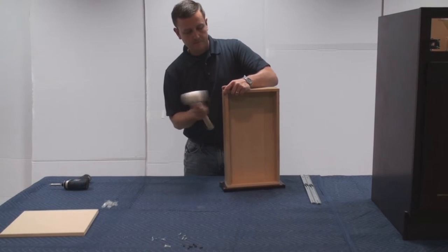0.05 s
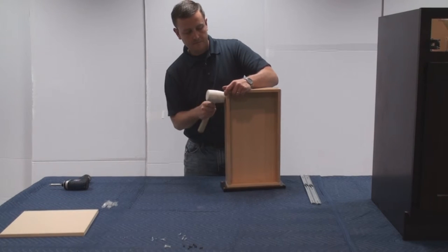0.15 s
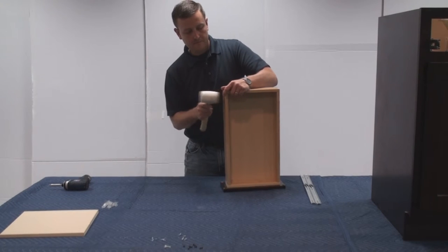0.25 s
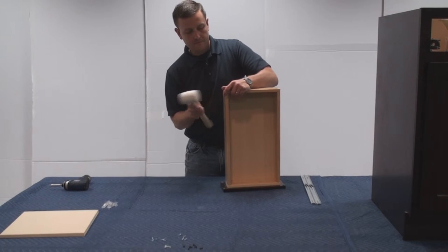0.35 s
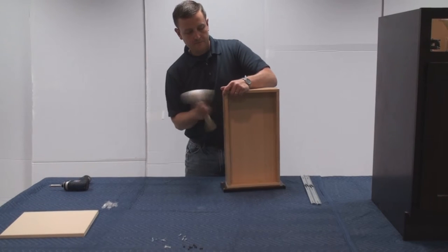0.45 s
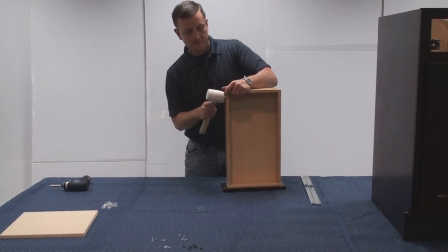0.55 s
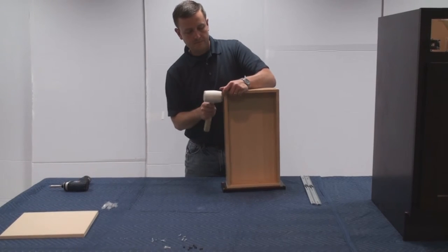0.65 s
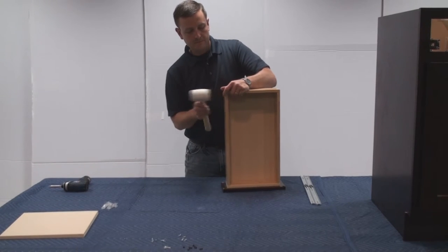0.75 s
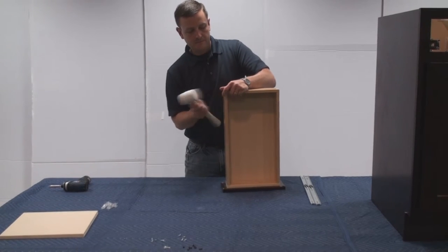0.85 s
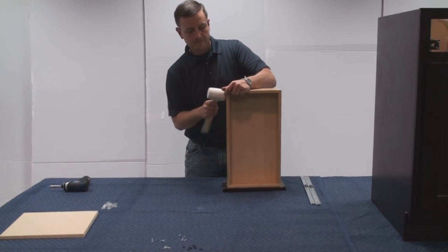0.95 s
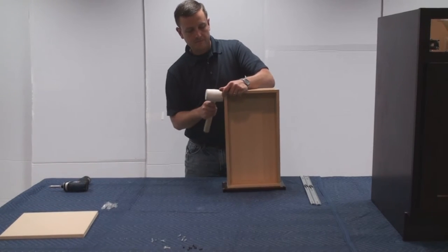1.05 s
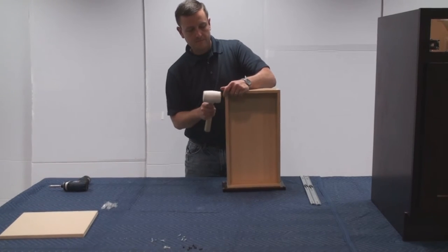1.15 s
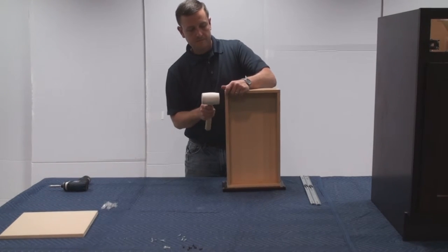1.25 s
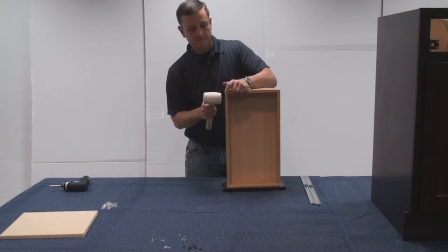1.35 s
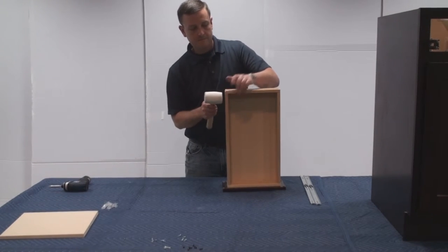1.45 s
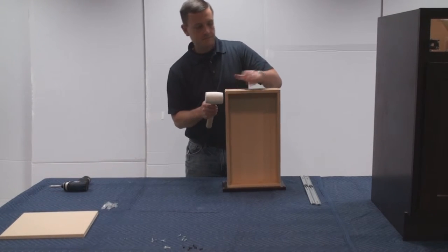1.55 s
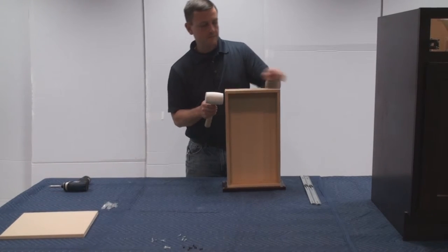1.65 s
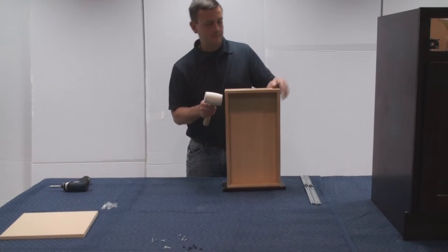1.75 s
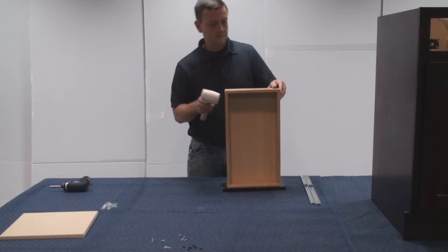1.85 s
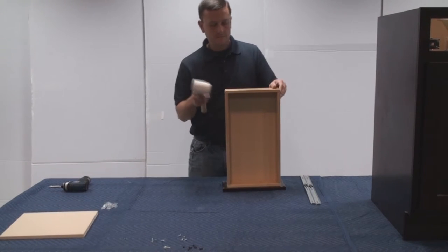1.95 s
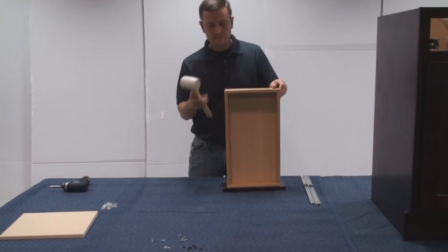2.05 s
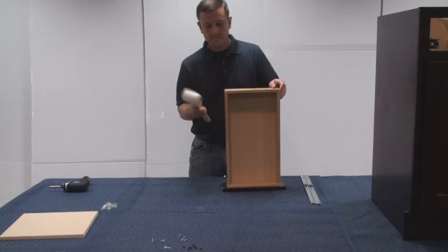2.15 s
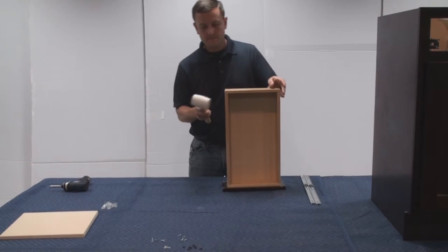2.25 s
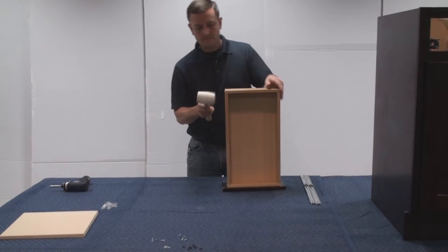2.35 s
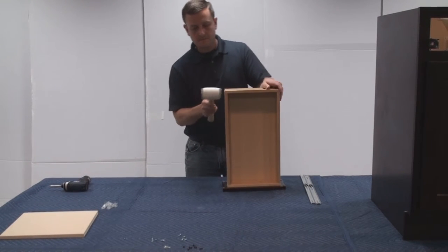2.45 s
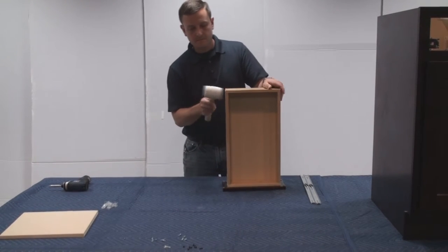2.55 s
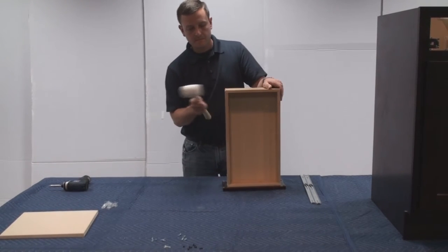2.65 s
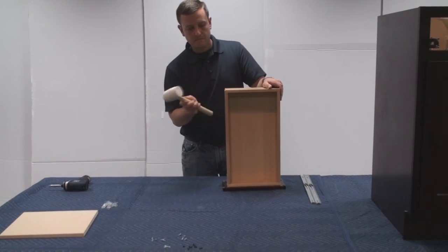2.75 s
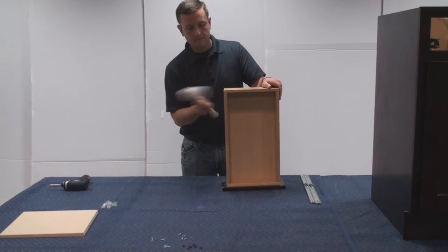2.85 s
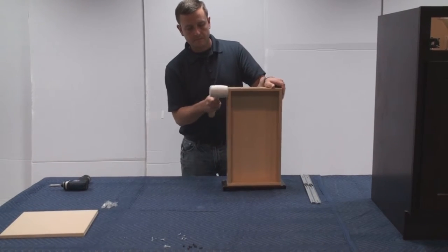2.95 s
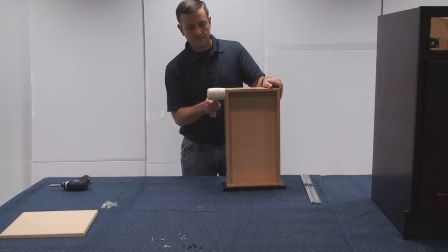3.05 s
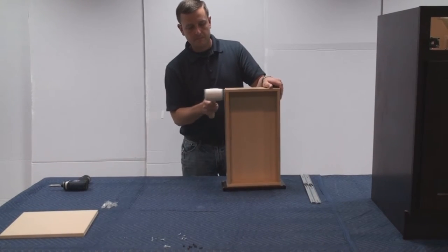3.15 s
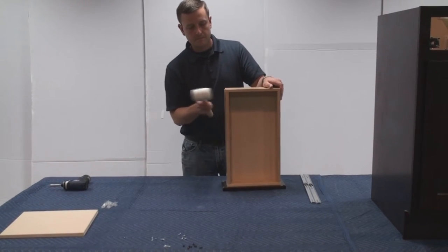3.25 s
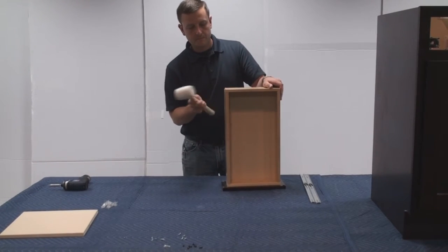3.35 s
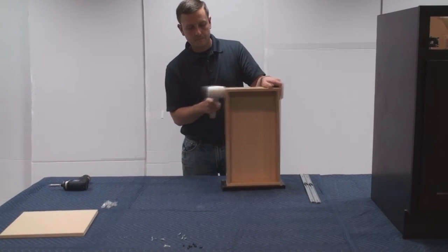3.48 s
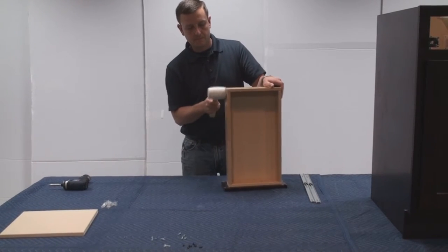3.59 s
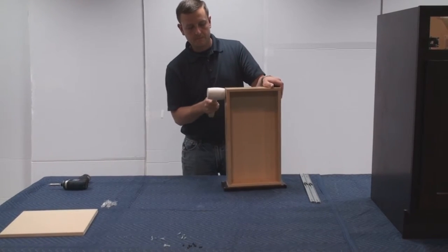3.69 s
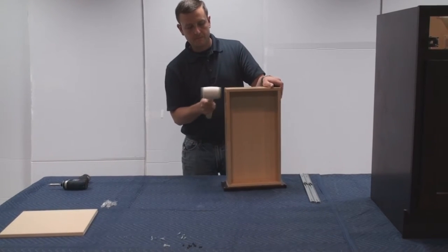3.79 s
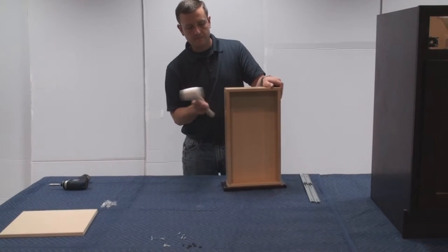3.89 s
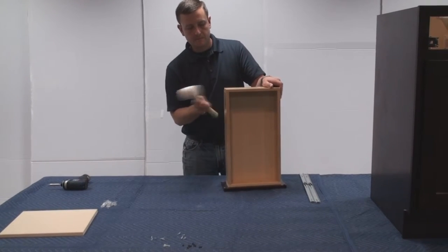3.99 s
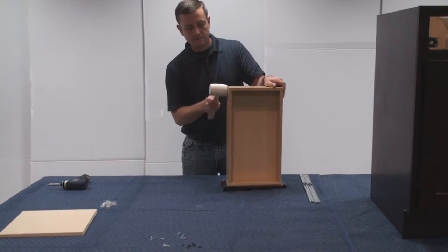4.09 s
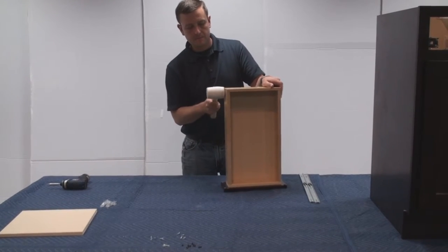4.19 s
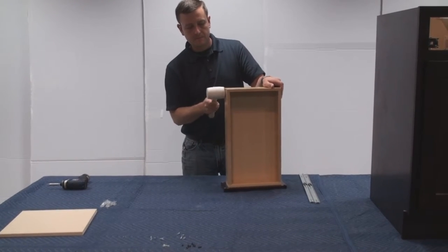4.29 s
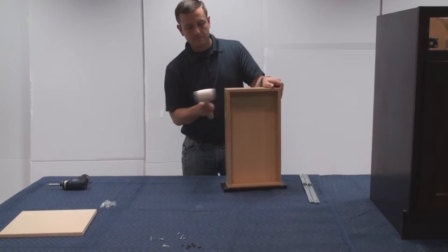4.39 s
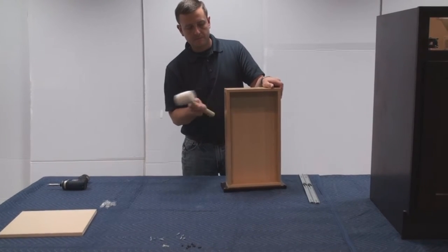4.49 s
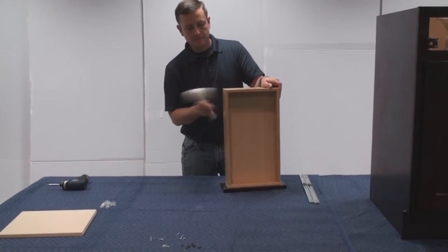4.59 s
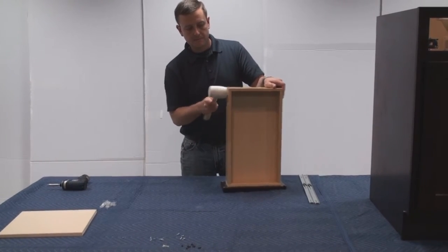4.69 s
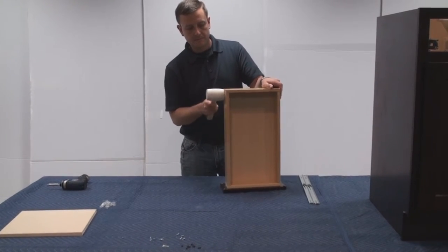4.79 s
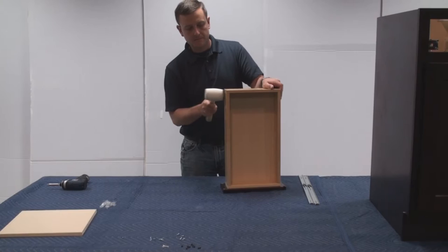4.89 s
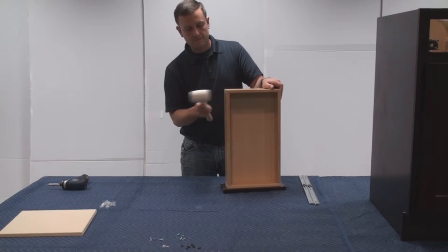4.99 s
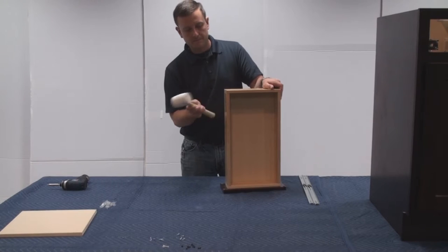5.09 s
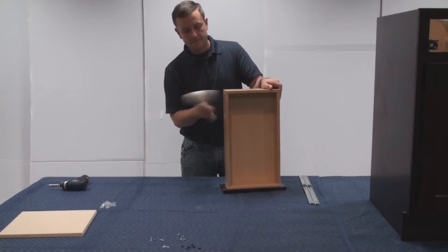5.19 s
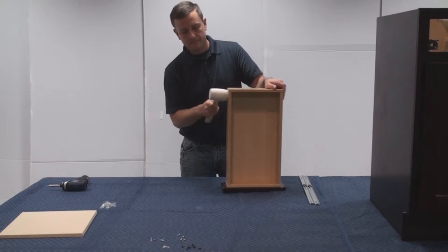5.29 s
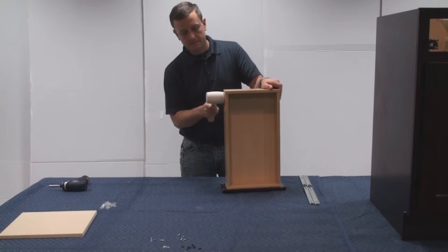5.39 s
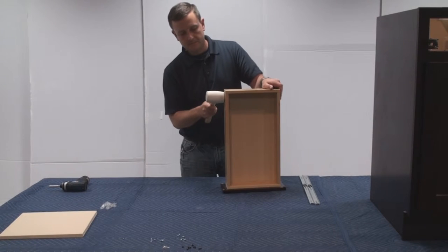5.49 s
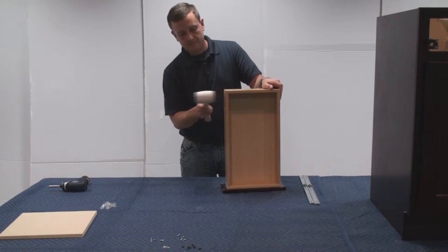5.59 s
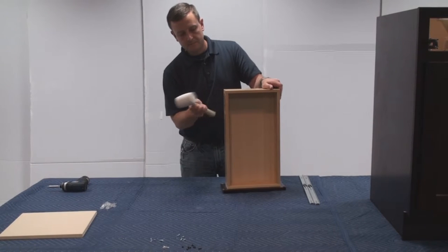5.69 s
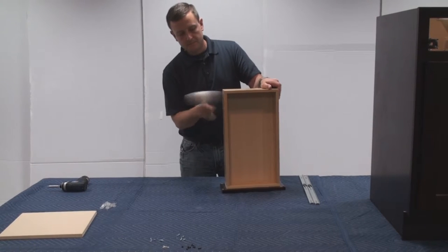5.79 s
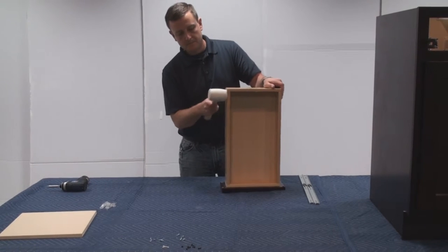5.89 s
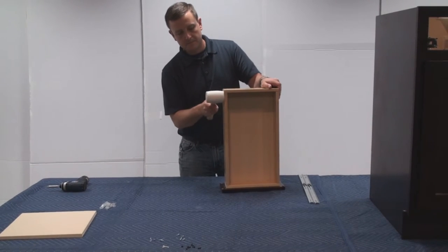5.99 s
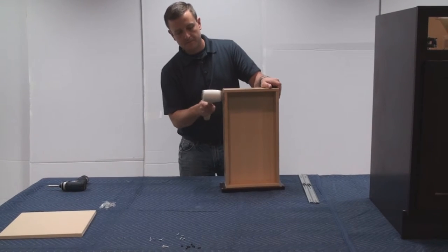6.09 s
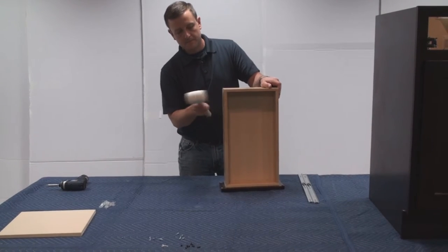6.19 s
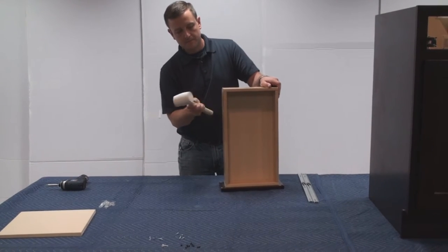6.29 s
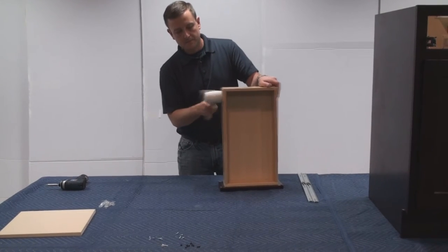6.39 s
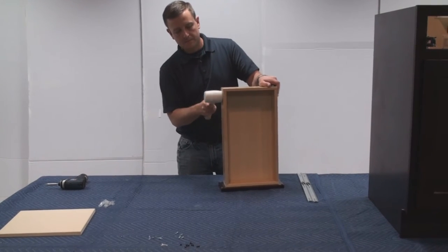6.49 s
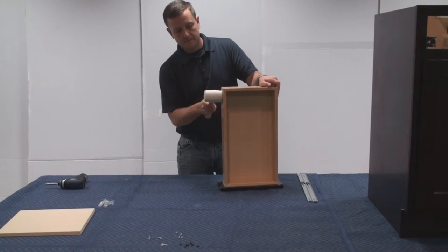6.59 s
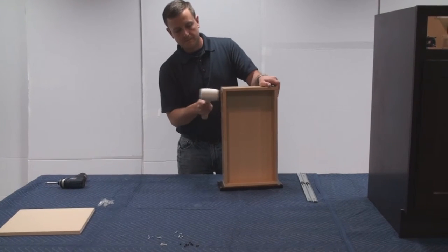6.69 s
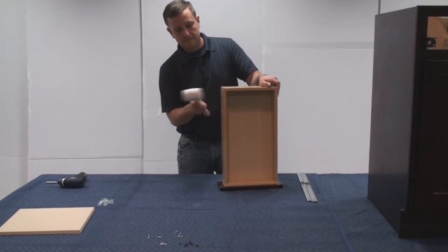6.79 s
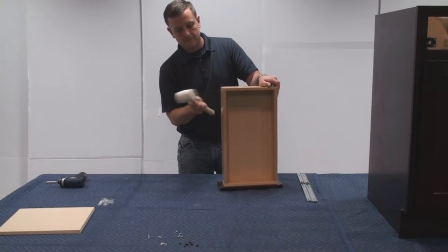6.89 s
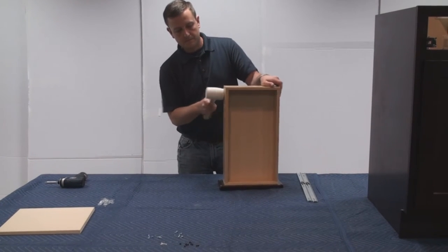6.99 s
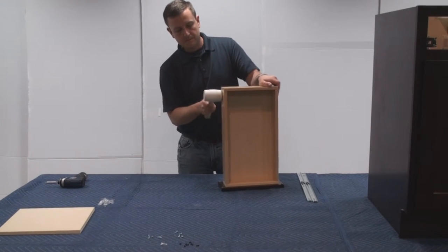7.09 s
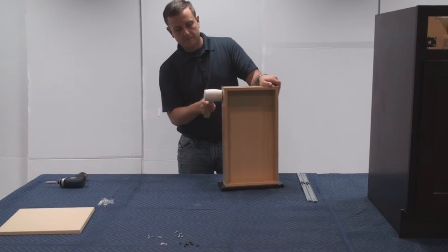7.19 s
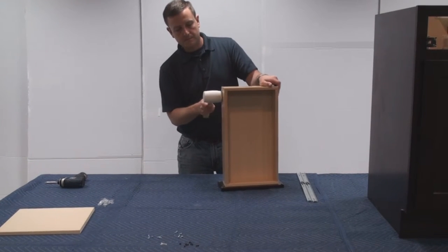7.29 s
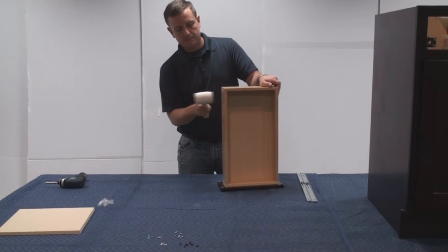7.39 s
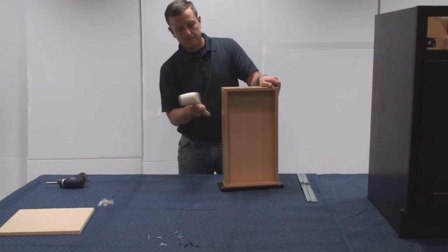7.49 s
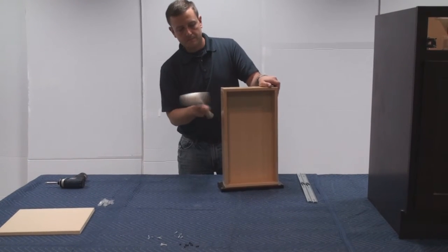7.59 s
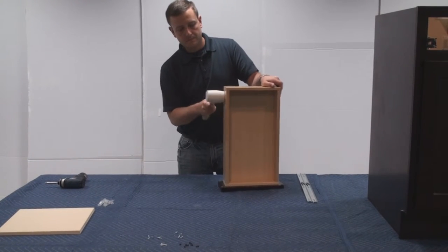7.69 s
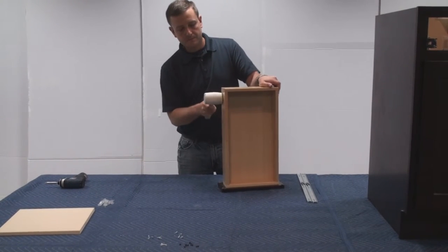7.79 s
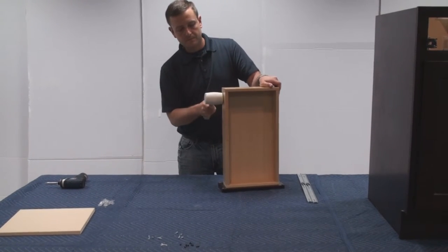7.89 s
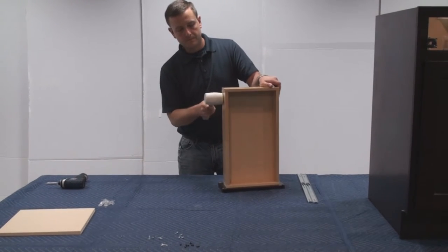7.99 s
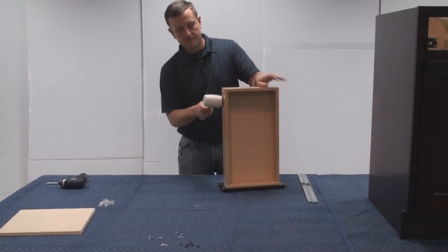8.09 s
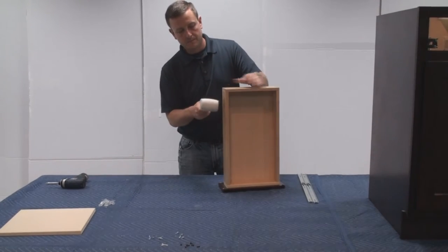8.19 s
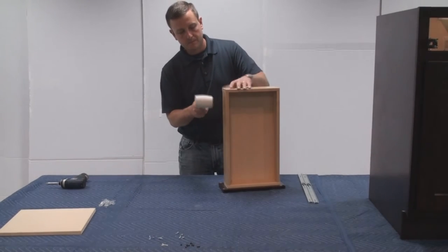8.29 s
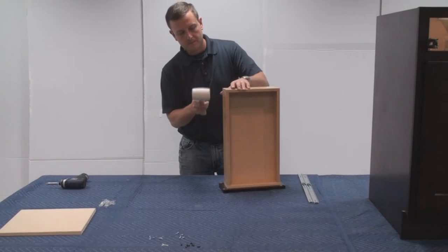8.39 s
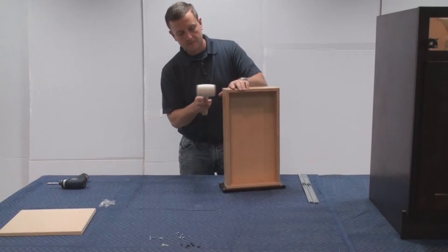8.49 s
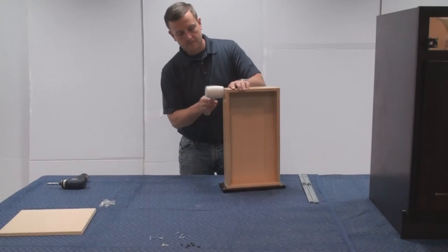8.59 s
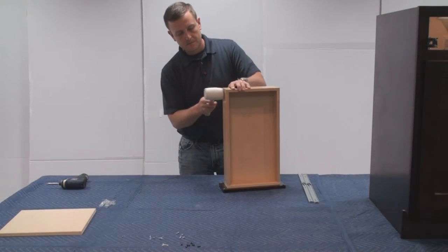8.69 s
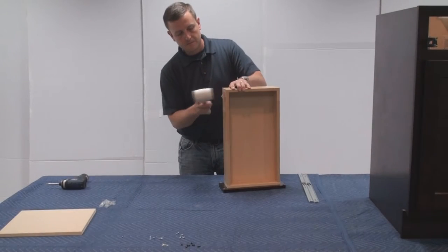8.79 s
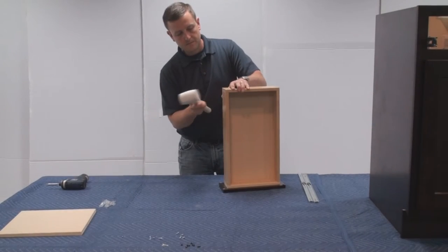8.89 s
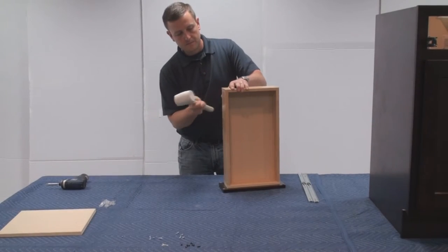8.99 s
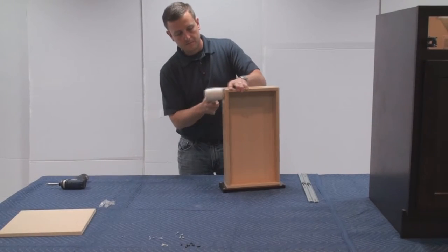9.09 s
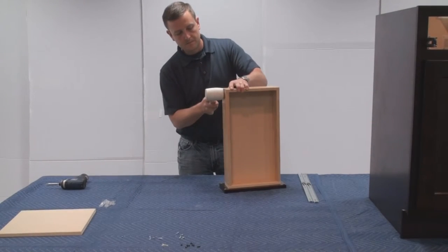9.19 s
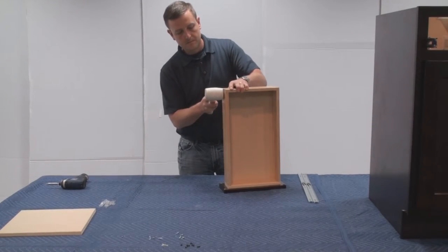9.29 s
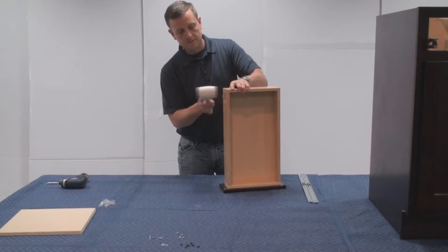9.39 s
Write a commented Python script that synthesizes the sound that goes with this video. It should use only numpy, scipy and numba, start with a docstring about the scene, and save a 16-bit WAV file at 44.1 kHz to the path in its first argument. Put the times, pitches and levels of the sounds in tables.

```python
"""Mallet driving a drawer box

A rubber mallet drives a wooden drawer box together on a padded bench in a bare, echoing workshop.
It opens on the dying tail of a blow; blows are ringing panel modes over noise for snap and chatter.
In between, the tight joint squeaks (falling, wavering tones) and ticks (short noise with high modes).
Decaying noise makes the echo, over ventilation and hum; a limiter rides it all and the right side clips."""
import sys
import numpy as np
from scipy import signal
from scipy.fft import rfft, irfft, next_fast_len
from scipy.io import wavfile
from scipy.ndimage import uniform_filter1d
from numba import njit

SR = 44100
rng = np.random.default_rng(int(sys.argv[2]) if len(sys.argv) > 2 else 0)


def digitize_waveform(pressure):
    """Quantize a signal to 16-bit integers and store it at the path in sys.argv[1].

    Rows of a 2-D input are taken as channels; values are limited to [-1, 1].
    """
    field = np.atleast_2d(pressure).T
    bounded = np.clip(field, -1, 1)
    quanta = np.round(bounded * 32767).astype(np.int16)
    wavfile.write(sys.argv[1], SR, quanta)


N = 416744

# Mallet blows, with the panel's main ring and how hard the striking spot drives the panel;
# the first row stands in for the dull, dying tail of a blow already struck:
# start_s, strength_db, main_ring_hz, panel_drive_db
BLOWS = [(0.0, -7.5, 684, 9.5), (0.247, 7.5, 692, 4.5), (0.635, 7, 577, 2.5), (1.055, 6, 578, 0.5),
         (2.644, -10, 590, 1.5), (3.037, 9, 600, -1.5), (3.635, 8.5, 610, 5.5), (4.188, 5, 560, -6),
         (4.766, 5.5, 674, 1), (5.366, 4, 594, 1.5), (5.966, 4, 692, 0.5), (6.538, 7, 598, -0.5),
         (7.098, 5, 625, 0), (7.778, 5, 647, -3), (8.743, -18, 588, 1.5), (9.232, 3.5, 625, 2)]
# Where bass, boom, thump, main ring, upper ring, clack and crack sit: pitch_hz
COLOUR_HZ = [60, 170, 340, 610, 1150, 2300, 6000]
# Blow colour at those pitches, a hand on top damping the board and pressing the box down: level_db
HAND_ON_TOP_DB = [-13, 5, 0.5, 1, -0.24, 0.5, -0.5]
# The same with the hand at the far corner, which lets the top board ring: level_db
HAND_AT_CORNER_DB = [-14.5, -1.0, -0.15, -0.5, 1.44, 1.2, 1]
# When the hand holds the far corner: start_s, end_s
HAND_AT_CORNER_S = (1.8, 8.25)
# Range that a slow push thumps in: pitch_hz, share (0 to 1)
THUMP_RANGE = [(340, 1), (610, 0)]
# Range that the striking spot lifts or drops: pitch_hz, share (0 to 1)
PANEL_RANGE = [(340, 0), (610, 1), (1150, 0)]
# The box's other modes, before each blow's own scatter: pitch_hz, level_db, t60_s
BOX_MODES = [(151.4, -18.5, 0.18), (189.2, -16, 0.27), (235.8, -12.5, 0.43), (334, -4, 0.032),
             (427.6, -14.5, 0.14), (551.3, -11, 0.17), (578.5, -0.5, 0.12), (645.6, -8, 0.23),
             (714.3, -9.5, 0.14), (821, -4, 0.047), (960, -74, 0.1), (1170, -2.5, 0.071), (1211, -5, 0.11),
             (1257, -4, 0.14), (1883, -14.5, 0.28), (1970, -4.5, 0.022), (2720, -20, 0.1),
             (3920, -5, 0.0065)]
# Dense, quickly damped response of the boards: pitch_hz, level_db (relative, per hertz)
BOARDS = [(40, -15), (110, -27.5), (170, 0.5), (330, -2.5), (600, 9.5), (800, 1), (1250, 6), (1600, -2),
          (2100, -1), (4000, -7), (6000, -12), (10000, -18.5), (15000, -28.5)]
# Stick-slip squeaks of the joint: start_s, length_s, start_hz, end_hz, level_db, overtone_step_db
SQUEAKS = [(2.335, 0.046, 2407, 1920, -33, -7.5), (2.532, 0.035, 1353, 1260, -31.5, -27)]
# Joint ticks as it is pressed and lined up: start_s, level_db
TICKS = [(2.510, -29), (8.245, -51)]
# What a ticking joint rings with: pitch_hz, level_db, t60_s
TICK_MODES = [(1780, 7, 0.09), (2270, -13, 0.13), (2960, 0, 0.06), (3740, -3, 0.06)]
# The room's ring: pitch_hz, t60_s
ROOM_T60 = [(100, 0.42), (260, 0.51), (700, 0.63), (2000, 0.59), (5000, 0.5), (9000, 0.39), (15000, 0.043)]
# Colour of ventilation and microphone hiss: pitch_hz, level_db (relative, per hertz)
AIR = [(15, -29), (25, -47), (48, -4.5), (90, -14), (121, -10.5), (224, -11), (301, -16), (344, -12),
       (383, -17.5), (749, -17.5), (2780, -28.5), (15000, -46)]
# Mains hum, before the limiter and right-hand gain: pitch_hz, level_db (RMS)
HUM = [(59.5, -60.5), (119, -57)]

# Main ring level beside the other modes (dB), and the share of the panel drive added to it
MAIN_RING_DB, MAIN_RING_SHARE = -1.5, 0.13
# Rubber stiffens under load: push time (s) and treble corner (Hz) at 0 dB strength, dB per doubling
PUSH_S, CONTACT_HZ, STIFFEN_DB_PER_OCTAVE = 0.00033, 8700, 5.5
# A slow push moves the whole box: dB of thump gained per dB of lost strength
THUMP_SLOPE = 0.25
# Treble limits of both channels and of the duller left one
TOP_HZ, LEFT_TOP_HZ = 15700, 11400


def blow_colour(s, strength_db, stiffness, panel_db):
    """Level at COLOUR_HZ: the hand shapes the ring, the spot sets the panel, soft blows are dull and thumpy."""
    hz = np.array(COLOUR_HZ)
    at_corner = HAND_AT_CORNER_S[0] < s < HAND_AT_CORNER_S[1]
    hand_db = HAND_AT_CORNER_DB if at_corner else HAND_ON_TOP_DB
    spot_db = panel_db * on_log_axis(hz, PANEL_RANGE)
    rubber_db = -20 * np.log10(1 + (hz / (CONTACT_HZ * stiffness)) ** 2)
    thump_db = -THUMP_SLOPE * strength_db * on_log_axis(hz, THUMP_RANGE)
    return hand_db + spot_db + rubber_db + thump_db


def knock(main_hz, main_db, tone_db, boards_db, push_s, main_t60=0.095, chatter_t60=0.082,
          snap_db=-4, snap_t60=0.0047, detune=0.006, scatter_db=3.0):
    """One blow: the joint snaps home and chatters through the boards while the panel modes ring on."""
    t = seconds(0.45)
    all_modes = [(main_hz, main_db, main_t60), *BOX_MODES]
    hz, db, t60 = np.transpose(all_modes)[:, :, None]
    # grip nudges the pitches and striking spot the levels, afresh for each blow
    grip, spot = rng.standard_normal((2, len(hz), 1))
    modes = unit(np.sin(2 * np.pi * hz * (1 + detune * grip) * t) * fade(t, t60))
    sign = rng.choice([-1, 1], hz.shape)
    sign[np.abs(hz - main_hz) < 30] = 1  # close neighbours swing with the main ring
    push = 1 - np.exp(-t / push_s)  # the rubber head takes a moment to press home
    ring = push * np.sum(sign * modes * undb(db + scatter_db * spot), axis=0)
    chatter = unit(fade(t, chatter_t60))
    snap = undb(snap_db) * unit(fade(t, snap_t60))
    contact = push * rng.standard_normal(len(t)) * (chatter + snap)
    boards = unit(colour(even(contact, width_hz=23.6), BOARDS))
    wood = unit(ring) + undb(boards_db) * boards
    return unit(colour(wood, list(zip(COLOUR_HZ, tone_db))))


def squeak(length, start_hz, end_hz, step_db, waver=0.023, die_t60=0.11):
    """Wood slips on wood: a brief, falling, unsteady tone that swells fast and dies as its overtones grow."""
    t = seconds(length)
    wobble = uniform_filter1d(rng.standard_normal(len(t)), size=40)
    hz = np.linspace(start_hz, end_hz, len(t)) * (1 + waver * wobble / wobble.std())
    phase = 2 * np.pi * np.cumsum(hz) / SR
    drag = np.sqrt(2 * t / length)
    # k = 0 is the fundamental
    tone = sum(undb(step_db * k ** 1.7) * drag ** k * np.sin((k + 1) * phase) for k in range(3))
    swell = np.sqrt(np.sin(np.pi * t / length))
    return unit(tone * swell * fade(t, die_t60))


def tick(t60=0.044, ring_db=-3):
    """A small dry crack of a joint with a few high wood modes, without the body's low ring."""
    t = seconds(.2)
    crack = even(rng.standard_normal(len(t)) * fade(t, t60), width_hz=660)
    crack_colour = [(100, -19), (600, 4), (2000, 1.5), (3500, -1.0), (6000, -13), (14000, -25)]
    crack = unit(colour(crack, crack_colour))
    ring = sum(undb(db) * unit(np.sin(2 * np.pi * hz * t) * fade(t, ring_t60))
               for hz, db, ring_t60 in TICK_MODES)
    return unit(crack + undb(ring_db) * unit(ring))


def workshop(x, direct_db=-8, build_s=0.0041, early_db=-2, early_t60=0.14, alike_hz=220, spread=0.74):
    """Direct sound, early reflections and dense echo off bare walls; fresh grain as worker and box shift."""
    t = seconds(.8)
    hz = np.fft.rfftfreq(len(t), 1 / SR)
    mid, side = rfft(rng.standard_normal((2, len(t))))
    apart = spread * hz / np.hypot(hz, alike_hz)  # the two microphones hear the lows alike
    spectrum = mid + np.array([[1], [-1]]) * apart * side
    centres, t60s = np.transpose(ROOM_T60)
    # overlapping bands that add up to one
    bands = [on_log_axis(hz, list(zip(centres, row))) for row in np.eye(len(centres))]
    late = sum(irfft(spectrum * band, len(t)) * fade(t, t60) for band, t60 in zip(bands, t60s))
    early = irfft(spectrum, len(t)) * fade(t, early_t60)
    build_up = 1 - np.exp(-t / build_s)
    echo = (late + undb(early_db) * early) * build_up
    response = np.array([even(channel, width_hz=49) for channel in echo])
    response[:, 0] += undb(direct_db)
    response[1] = np.roll(response[1], 1)  # the sound reaches the left microphone a sample sooner
    return signal.fftconvolve(x[None], response, axes=1)


def background(air_db=-48, tilt_db=1, shared=0.55):
    """Steady ventilation noise, partly common to both sides and tilted right, with a faint mains hum."""
    left, right, both = rng.standard_normal((3, N))
    air = unit(colour(np.array([left, right]) + shared * both, AIR)) * np.sqrt(N)  # unit RMS
    t = np.arange(N) / SR
    hum = sum(np.sqrt(2) * undb(db) * np.sin(2 * np.pi * hz * t) for hz, db in HUM)
    return undb([[air_db - tilt_db], [air_db + tilt_db]]) * air + hum


def undb(db):
    """Decibels to gain."""
    return 10 ** (np.asarray(db) / 20)


def seconds(length):
    """Time axis of the given length."""
    return np.arange(int(length * SR)) / SR


def unit(x):
    """Scale to unit energy."""
    return x / np.sqrt(np.sum(x ** 2, axis=-1, keepdims=True))


def fade(t, t60):
    """Exponential decay, 60 dB down after t60."""
    return np.exp(-np.log(1000) * t / t60)


def on_log_axis(hz, points):
    """Read (Hz, value) points on a log-frequency axis."""
    f, value = np.transpose(points)
    return np.interp(np.log(np.maximum(hz, 1)), np.log(f), value)


def colour(x, points):
    """Causal filter with the given (Hz, dB) response, made from its cepstrum."""
    n = 2 * next_fast_len(x.shape[-1])
    gain = undb(on_log_axis(np.fft.rfftfreq(n, 1 / SR), points))
    cepstrum = irfft(np.log(gain))
    # folding the cepstrum forward gives minimum phase
    cepstrum[1:n // 2] *= 2
    cepstrum[n // 2 + 1:] = 0
    return irfft(rfft(x, n) * np.exp(rfft(cepstrum)))[..., :x.shape[-1]]


def even(x, width_hz):
    """Level out spectral lumps broader than the width, keeping the fine grain, at unit energy."""
    power = np.abs(rfft(x)) ** 2
    smooth = uniform_filter1d(power, size=max(int(width_hz * len(x) / SR), 1))
    hz = np.fft.rfftfreq(len(x), 1 / SR)
    inverse_db = -10 * np.log10(smooth + 1e-12)
    return unit(colour(x, np.column_stack([hz, inverse_db])[1:]))


def add(track, s, sound):
    """Mix a sound into the track at time s."""
    i = max(int(s * SR), 0)
    track[:, i:i + sound.shape[1]] += sound[:, :N - i]


@njit
def follow(x, attack_s, release_s):
    """Peak follower: quick up, slower down."""
    out, e = np.empty(len(x)), 0.
    for i in range(len(x)):
        e += (x[i] - e) / (SR * (attack_s if x[i] > e else release_s))
        out[i] = e
    return out


def low_pass(x, hz):
    """Steep low-pass, run both ways so that it adds no delay or phase shift."""
    return signal.sosfiltfilt(signal.ellip(10, .05, 50, hz, fs=SR, output="sos"), x)


def scene(mallet_db=32, joint_db=32, chatter_db=3.0, chatter_growth=0.055):
    """Opening tail, blows, squeaks and ticks all sound from the box into the room, over the background."""
    out = background()
    for s, db, main_hz, panel_db in BLOWS:
        stiffness = 2 ** (db / STIFFEN_DB_PER_OCTAVE)
        main_db = MAIN_RING_DB + MAIN_RING_SHARE * panel_db
        boards_db = chatter_db + chatter_growth * db  # harder blows shake the joint more
        tone_db = blow_colour(s, db, stiffness, panel_db)
        blow = knock(main_hz, main_db, tone_db, boards_db, PUSH_S / stiffness)
        add(out, s, undb(mallet_db + db) * workshop(blow))
    for s, length, start_hz, end_hz, db, step_db in SQUEAKS:
        slip = squeak(length, start_hz, end_hz, step_db)
        add(out, s, undb(joint_db + db) * workshop(slip, direct_db=-3))
    for s, db in TICKS:
        add(out, s, undb(joint_db + db) * workshop(tick()))
    return out


def record(dry, ceiling_db=-2, attack_s=0.00021, release_s=0.017, right_db=8.5):
    """One limiter rides both channels; the right one is then turned up and clips, the left is duller."""
    peak = follow(np.max(np.abs(dry), axis=0), attack_s, release_s)
    left, right = dry / np.maximum(peak / undb(ceiling_db), 1)
    clipped = np.clip([low_pass(left, LEFT_TOP_HZ), right * undb(right_db)], -1, 1)
    return low_pass(clipped, TOP_HZ)


dry = scene()
out = record(dry)
digitize_waveform(out)
```